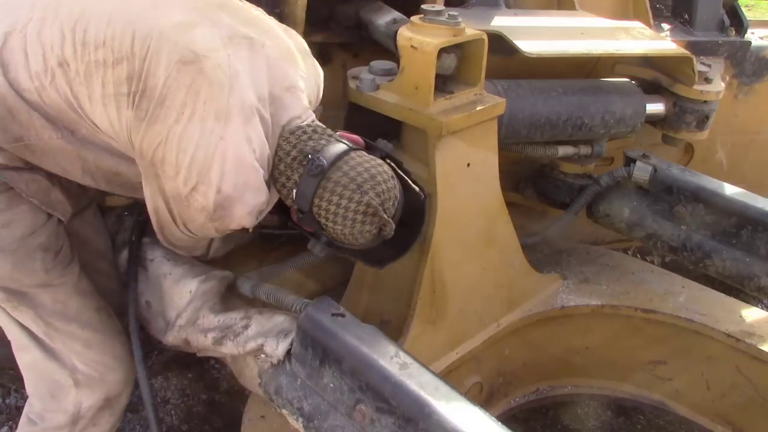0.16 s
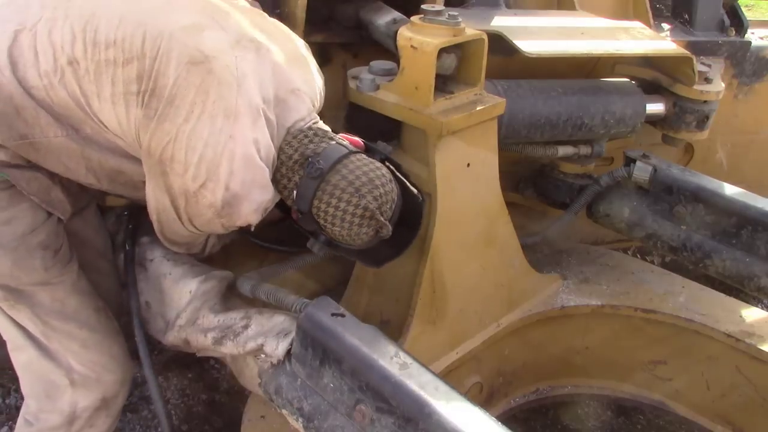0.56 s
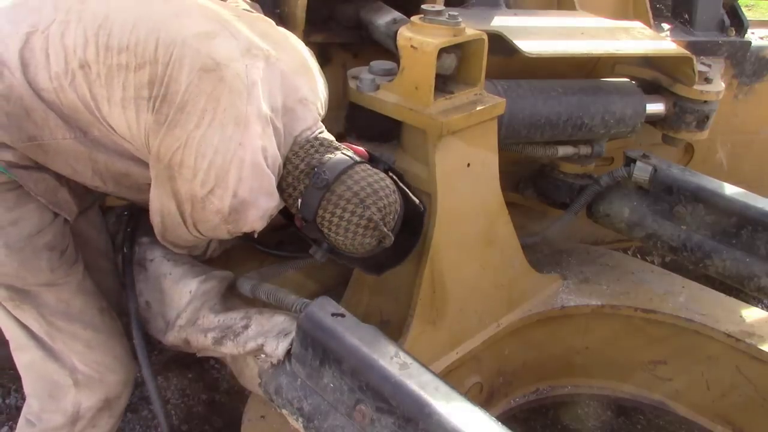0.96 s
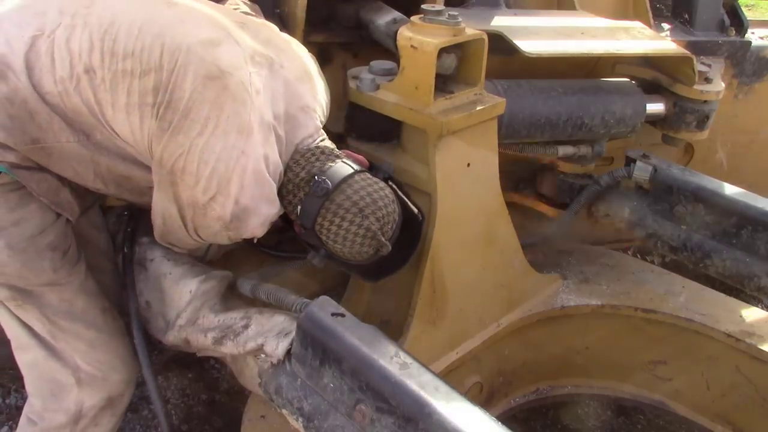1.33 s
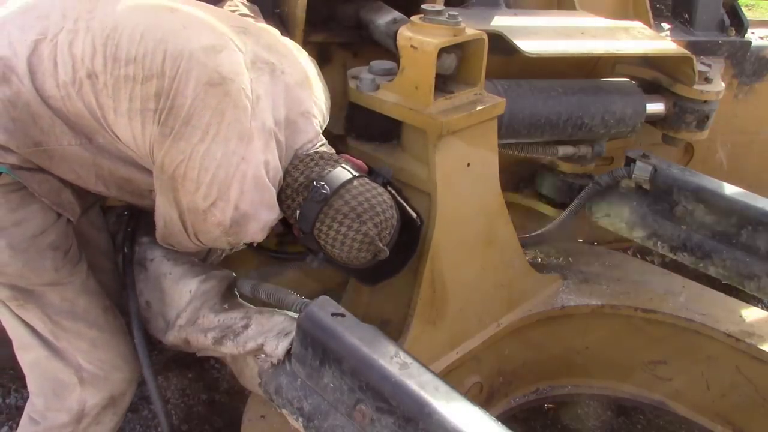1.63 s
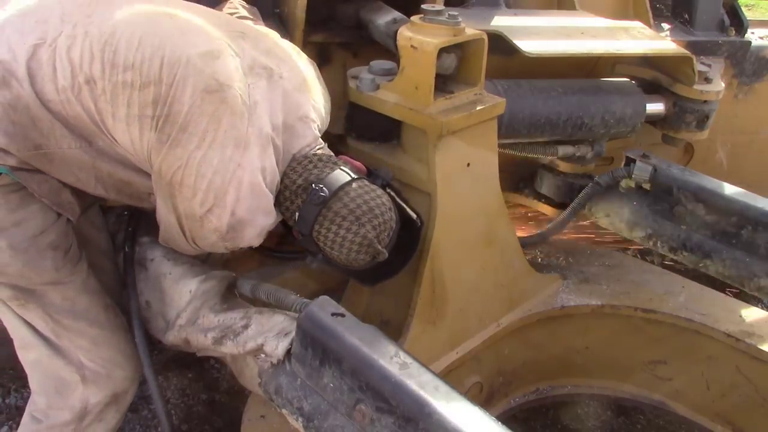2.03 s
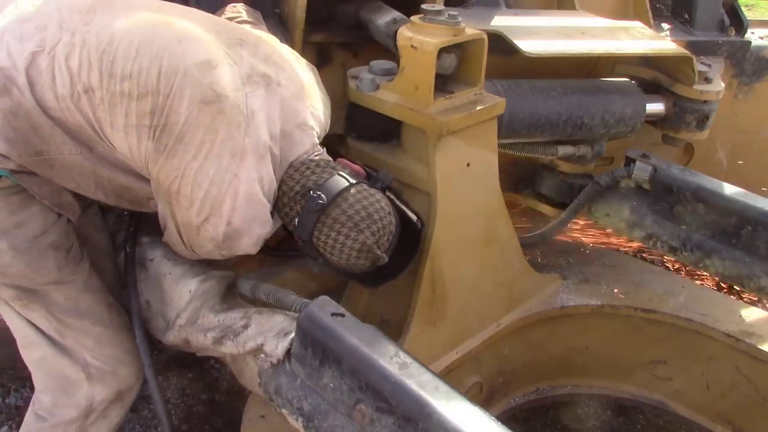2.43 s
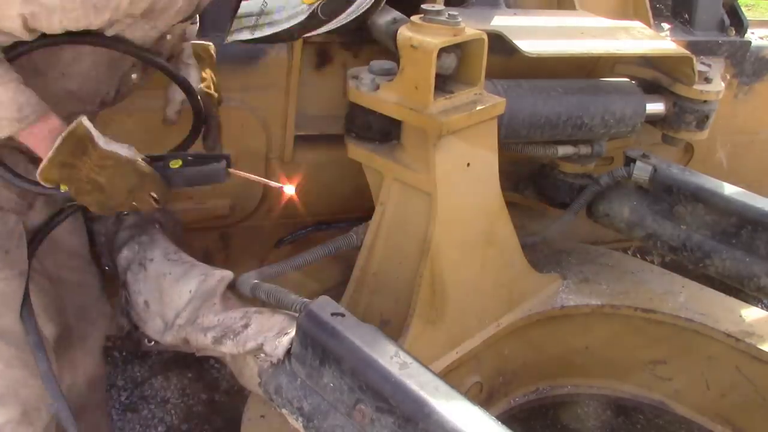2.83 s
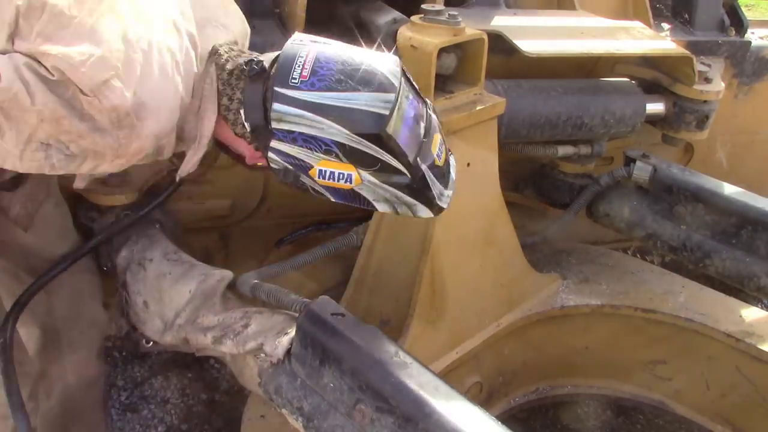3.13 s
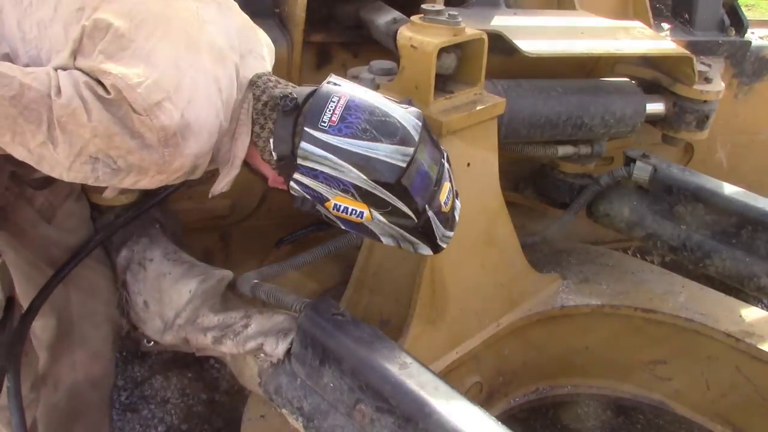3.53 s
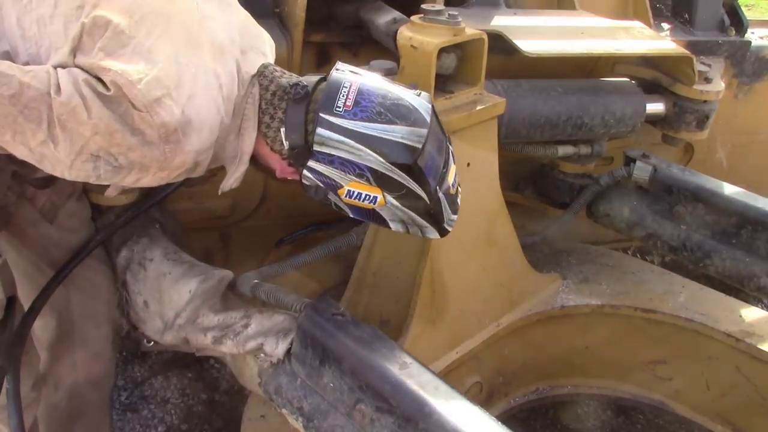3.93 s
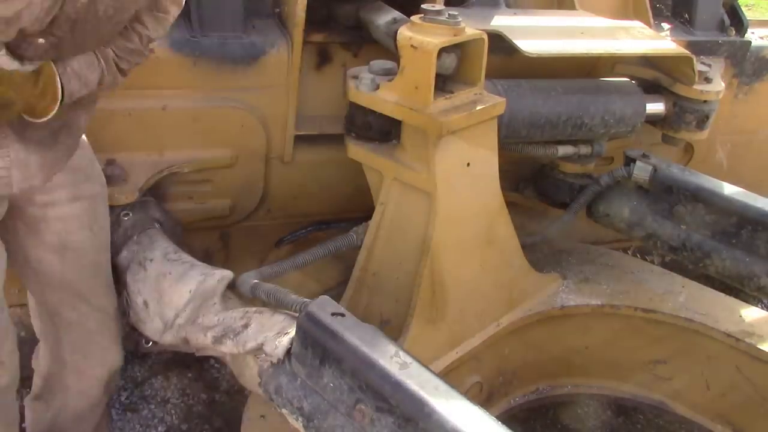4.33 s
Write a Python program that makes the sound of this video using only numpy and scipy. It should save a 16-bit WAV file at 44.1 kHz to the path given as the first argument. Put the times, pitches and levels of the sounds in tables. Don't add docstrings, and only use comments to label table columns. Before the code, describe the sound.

Outdoors, close to an idling engine-driven welder, low wind buffets the microphone. An abrupt cut moves to heavy steel machinery, with the engine farther off and an air jet hissing. The engine revs up, then the arc spits in ragged crackling bursts that ring the metal and drag the engine down. The arc stops, the air shuts off, and a cross-fade brings a close, steady welder and whining compressor, light wind puffs and tiny squeaks.

```python
import sys
import numpy as np
from scipy import signal
from scipy.fft import rfft, irfft, next_fast_len
from scipy.io import wavfile
from scipy.ndimage import uniform_filter1d

SR = 44100
rng = np.random.default_rng(int(sys.argv[2]) if len(sys.argv) > 2 else 0)


def store_wav(level_fs):
    pcm = np.round(np.clip(np.atleast_2d(level_fs), -1, 1) * 32767)
    wavfile.write(sys.argv[1], SR, pcm.T.astype(np.int16))


def level_to_linear(level):
    exponent = np.asarray(level, float) / 20
    return 10 ** exponent


N = 197470
T = np.arange(N) / SR

# pitch_hz, level_db
WIND_COLOUR = [(5, 8.5), (25, 8.5), (60, -1.5), (90, 1), (130, -19), (300, -9), (600, -46)]
# pitch_hz, level_db
BREEZE_COLOUR = [(60, -21), (150, -16), (300, -8), (600, 4), (1000, -1), (1800, -3.5), (3500, -39),
                 (8000, -37)]
# peak_s, level_db
PUFFS = [
    (2.26, -79),
    (2.95, -71),
    (3.41, -67),
    (3.52, -64),
    (3.63, -63),
    (3.8, -57),
    (3.95, -68),
    (4.42, -70),
]
# multiple of firing rate, level_db
IDLE_TONES = [(1, -67), (6, -71), (8, -72), (9, -52), (11, -66), (12, -62), (14, -67), (15, -61), (16, -62),
              (17, -58), (18, -60), (20, -66), (21, -58), (22, -60), (25, -60), (27, -60), (31, -65),
              (32, -60), (36, -63), (38, -61), (39, -64), (40, -63), (44, -65), (46, -67), (60, -65),
              (66, -66), (72, -64), (74, -65), (119, -66), (120, -67)]
# multiple of firing rate, level_db
LOADED_TONES = [(3, -86), (5, -81), (6, -70), (9, -61.5), (15, -67)]
# multiple of firing rate, level_db
RUNNING_TONES = [(3, -74), (5, -82), (6, -63), (7, -67), (8, -72), (9, -52.5), (12, -55), (14, -62),
                 (15, -65), (17, -64), (18, -59), (21, -58), (34, -63), (41, -66), (45, -65), (46, -64),
                 (47, -65), (51, -65), (54, -61), (55, -64), (56, -58), (57, -56), (59, -62), (62, -67),
                 (64, -64), (73, -64), (96, -67), (98, -67), (99, -61)]
# pitch_hz, level_db (per Hz)
WELDER_ROAR = [(88, -41), (150, -26), (354, -23.5), (430, -14), (512, -19), (634, -12.5), (713, -8.5),
               (1090, -9.5), (1820, -2), (2960, -2.5), (3320, -5.5), (5100, 0), (5520, -4.5), (9340, -8.5),
               (15800, -12)]
# pitch_hz, level_db (per Hz)
AIR_COLOUR = [(300, -48), (600, -14.5), (1000, -15.5), (1500, -7.5), (2200, -9.5), (3400, -10), (5000, -1),
              (7000, -7), (8500, -3), (9900, -1.5), (12000, -2), (15800, -11)]
# pitch_hz, width_hz, level_db
HOUSING = [(1090, 155, 6.5), (1557, 530, 6.5), (2270, 140, -4.5), (2716, 870, 6), (5450, 320, -1.5),
           (7350, 1500, 3), (8100, 200, -3), (9100, 810, 3.5), (13830, 530, 6.5), (15670, 440, 13)]
# start_s, length_ms, level_db
SPITS = [(.77, 3.2, -32), (.818, 7.1, -31.5), (.947, 15.5, -37.5), (.967, 6.6, -38), (1.089, 8, -34),
         (1.177, 16.7, -35.5), (1.231, 10, -35), (1.336, 17, -36.5), (1.389, 11.6, -38), (1.409, 9, -36),
         (1.49, 16.4, -36.5), (1.545, 8.6, -34.5), (1.596, 9.3, -33), (1.683, 11.8, -34.5),
         (1.704, 10.7, -36.5), (1.745, 11.3, -34), (1.779, 5.8, -34.5), (1.796, 9.5, -35),
         (1.939, 14.3, -35.5), (1.972, 12.3, -36), (2.072, 7.4, -35.5), (2.109, 8.2, -34.5),
         (2.124, 5.2, -30), (2.136, 13, -37), (2.186, 11.4, -35), (2.225, 10.9, -35), (2.347, 11.5, -37),
         (2.375, 10, -38.5), (2.546, 10.8, -34.5), (2.582, 9.3, -39)]
# start_s, length_ms, level_db
BURNS = [(1.053, 31.5, -37.5), (1.125, 22, -39.5), (1.247, 72, -38.5), (1.522, 11.4, -41.5),
         (1.644, 26, -38), (1.717, 16.3, -42), (1.834, 51.5, -40.5), (1.888, 30.4, -41), (1.954, 20, -40),
         (2.006, 28.7, -38.5), (2.042, 6.7, -34.5), (2.086, 13.3, -39), (2.154, 19.9, -42),
         (2.246, 77, -38.5), (2.386, 41, -40.5), (2.439, 33, -38), (2.49, 42, -41.5), (2.566, 13.8, -39.5)]
# pitch_hz, width_hz, level_db
FRAME = [(1343, 75, -1), (1790, 600, -1.5), (2906, 310, -0.5), (3497, 146, -1), (5190, 790, 4),
         (5766, 390, 2), (6470, 170, 0), (7300, 660, -6.5), (9570, 1050, 2), (10920, 770, -0.5),
         (11520, 430, 0), (12400, 400, -5.5), (13230, 650, -2), (15200, 850, -3)]
# multiple of rotor rate, level_db
ROTOR_TONES = [(2, -78), (3, -69), (4, -59), (5, -59), (6, -60), (7, -57), (8, -63), (9, -62), (11, -51),
               (12, -54), (13, -58), (14, -63), (15, -56), (16, -50.5), (17, -53), (18, -58), (19, -54),
               (20, -61), (21, -60), (23, -61), (24, -60), (28, -59), (31, -62), (32, -60), (33, -60),
               (35, -58), (36, -62), (41, -63), (46, -61), (47, -62)]
# time_s, rate_hz
ROTOR_RATE = [
    (0, 158.5),
    (3.12, 158.6),
    (3.6, 157.96),
    (3.92, 158.28),
    (4.1, 157.85),
    (4.48, 157.95),
]
# pitch_hz, level_db (per Hz)
MACHINES_ROAR = [(88, -67), (150, -46), (254, -29), (405, -26), (622, -16.5), (727, -12.5), (801, -20),
                 (866, -12), (1070, -10), (1360, -11), (1710, -6), (2580, -3), (3460, -6), (4910, -3.5),
                 (15800, -12)]
# start_s, length_ms, slip_rate_hz, high_ring_hz, high_ring_db
SQUEAKS = [
    (4.314, 25, 925, 9420, -38.5),
    (4.371, 13, 854, 11200, -42.5),
    (4.383, 22, 758, 11200, -65),
    (4.422, 47.7, 799, 10570, -43),
]
# pitch_hz, level_db
WIDTH = [(60, -30), (300, -25), (600, -28.5), (1000, -29), (3000, -29), (8000, -27), (10500, -24),
         (12000, -19), (15800, -19)]

CUT_S, FADE_OUT_S, FADE_IN_S = 0.493, (2.703, 2.83), (2.749, 2.955)
IDLE_HZ, RUNNING_HZ = 70.77, 88.95
REV_S, ARC_OFF_S = (0.755, 0.825), 2.6


def curves(table):
    s, *columns = np.transpose(table)
    return [np.interp(T, s, c) for c in columns]


def ramp(start, end):
    return np.clip((T - start) / (end - start), 0, 1)


def unit(x):
    return x / np.sqrt(np.mean(x ** 2))


def smooth(x, seconds):
    keep = np.exp(-1 / (seconds * SR))
    return signal.lfilter([1 - keep], [1, -keep], x)


def shape(x, gain):
    size = next_fast_len(N, True)
    hz = np.arange(size // 2 + 1) * SR / size + 1e-3
    return irfft(rfft(x, size) * gain(hz), size)[:N]


def slope(points):
    hz, db = np.transpose(points)
    return lambda f: level_to_linear(np.interp(np.log(f), np.log(hz), db))


def bump(f, centre, width):
    return 1 / (1 + (2 * (f - centre) / width) ** 2)


def walk(rate):
    hold = int(SR / rate)
    steps = np.repeat(rng.standard_normal(N // hold + 1), hold)
    return unit(uniform_filter1d(uniform_filter1d(steps, hold), hold)[:N])


def hiss(points, flicker_db, rate):
    def colour(f):
        return slope(points)(f) * level_to_linear(sum(db * bump(f, hz, w) for hz, w, db in HOUSING))

    noise = shape(rng.standard_normal(N), colour)
    out, shared = 0, walk(rate)
    for octave in range(8):
        band = shape(noise, lambda f: np.cos(np.pi / 2 * np.clip(np.log2(f / 125) - octave, -1, 1)) ** 2)
        out = out + band * level_to_linear(flicker_db * (0.79 * shared + 0.43 * walk(rate)))
    return unit(out)


def tones(table, hz, wobble_db, live):
    out = np.zeros(N)
    turn = 2 * np.pi * np.cumsum(hz[live]) / SR
    knots = np.arange(0, N / SR + 1, 0.11)
    for k, db in table:
        swell = np.interp(T[live], knots, level_to_linear(db + wobble_db * rng.standard_normal(len(knots))))
        out[live] += np.sqrt(2) * swell * np.sin(k * turn + 2 * np.pi * rng.random())
    return out


def clatter(x, firing_hz, repeat):
    def comb(f):
        echo = np.exp(2j * np.pi * f * 3 / firing_hz)
        return 1 / np.abs(1 - repeat * bump(f, 0, 5000) * echo)

    return unit(shape(x, comb))


def wind():
    gusts = [unit(shape(rng.standard_normal(N) * level_to_linear(1.5 * walk(14)), slope(WIND_COLOUR))) for _ in range(2)]
    first_scene = np.clip((0.458 - T) / 0.0043, 0, 1)
    breeze = unit(shape(rng.standard_normal(N), slope(BREEZE_COLOUR))) * level_to_linear(1.5 * walk(17))
    puffs = sum(level_to_linear(db - 320 * np.abs(T - s)) for s, db in PUFFS)
    breeze = breeze * (level_to_linear(-88) + level_to_linear(-67) * (T < CUT_S) + puffs)
    rattle = level_to_linear(-65) * first_scene * np.sin(2 * np.pi * 300 * T)
    port_level = level_to_linear(np.array([[-57.], [-50.]]))
    return np.array(gusts) * first_scene * port_level + (breeze + rattle) * np.array([[1], [-1]])


def yard_rumble():
    level = level_to_linear(-106 + 8.2 * walk(13))
    return level * unit(shape(rng.standard_normal(N), lambda f: 1 / (1 + (f / 120) ** 4)))


def welder_levels(burning):
    cut = ramp(CUT_S - 0.01, CUT_S + 0.0048)
    rev = ramp(*REV_S)
    fade = ramp(*FADE_OUT_S[::-1])

    def stage(close_db, far_db, speed_db):
        return close_db + cut * (far_db - close_db) + rev * (speed_db - far_db)

    load = smooth(burning, 0.11)
    surge_db = 9 * bump(T, 0.8, 0.034)
    tone = fade * level_to_linear(stage(0.5, -11, -1.5) + 0.53 * surge_db + 2.4 * load)
    roar = fade * level_to_linear(stage(-39, -51, -52) + surge_db + 13.5 * load)
    build_db = -3 * ramp(CUT_S + 0.4, CUT_S + 0.095)
    lifted_db = -6 * ramp(ARC_OFF_S - 0.02, ARC_OFF_S + 0.026)
    valve = 0.29 * fade + 0.69 * ramp(2.7727, 2.767)
    air = valve * cut * level_to_linear(-42 + build_db + lifted_db)
    return tone, roar, air


def welder(strength):
    burning = 1. * (strength > level_to_linear(-46))
    tone, roar, air = welder_levels(burning)
    governor_hz = 1.0 * ramp(ARC_OFF_S + 0.1, ARC_OFF_S - 0.05)
    free_hz = IDLE_HZ + ramp(*REV_S) * (RUNNING_HZ - IDLE_HZ + governor_hz)
    hz = free_hz * (1 - 0.085 * smooth(burning, 0.026))
    up = np.clip((free_hz - 71) / 3, 0, 1)
    hum = (1 - up) * tones(IDLE_TONES[1:], hz, 1.2, T < 0.8) + up * tones(LOADED_TONES, hz, 1.2, T < 2.9)
    panel = level_to_linear(-55) * bump(12 * hz, 1035, 50) ** 0.8
    hum = hum + up * panel * tones([(12, 0)], hz, 1, T < 2.9)
    duck = smooth(burning, 0.008)
    rattle = clatter(hiss(WELDER_ROAR, 0.3, 17), IDLE_HZ, 0.58)
    engine = tone * hum * level_to_linear(2.2 * duck) + roar * rattle
    return engine * level_to_linear(-14 * duck) + air * level_to_linear(-2.9 * duck) * hiss(AIR_COLOUR, 0.45, 25.52)


def current():
    out, bursts = np.zeros(N), list(SPITS)
    for s, ms, db in BURNS:
        parts = max(1, round(ms / 21))
        bursts += [(s + k * ms / parts / 1000, ms / parts, db) for k in range(parts)]
    for s, ms, db in bursts:
        live = slice(int((s - 0.003) * SR), int((s + ms / 1000) * SR))
        age = T[live] - T[live][0]
        growth_db = 1.0 - 3.38 * (1.5 - age / age[-1]) * min(1, 0.0125 / age[-1])
        swell_in = np.clip(age / 0.0045, 0, 1)
        out[live] = np.maximum(out[live], level_to_linear(db + growth_db) * swell_in)
    return uniform_filter1d(out, size=20)


def arc(strength):
    def drop_ring(f):
        rings = bump(f, 1500, 900) + 0.44 * bump(f, 3240, 600)
        rings = rings + 0.59 * bump(f, 5100, 1500) + 0.4 * bump(f, 10500, 4000)
        return level_to_linear(-9.5) * rings / (1 + (1000 / f) ** 6)

    def open_air(f):
        return level_to_linear(-15.5) * bump(f, 8000, 16000) / (1 + (1200 / f) ** 6) + level_to_linear(-33) * (f < 400)

    drive = strength + np.sqrt(smooth(strength ** 2, 0.025)) * level_to_linear(-22)
    drive = drive * level_to_linear(2.3 * walk(350))
    drops = (rng.random(N) < 160 / SR) * rng.standard_normal(N) * 25
    out = shape(drops * strength, drop_ring)
    out = out + shape(rng.standard_normal(N) * drive, open_air)
    for hz, width, db in FRAME:
        spit = rng.standard_normal(N) * level_to_linear(1.3 * walk(90))
        out = out + shape(spit * drive, lambda f: level_to_linear(db) * bump(f, hz, width) / (1 + (900 / f) ** 6))
    rounded = 0.069 * np.tanh(out * level_to_linear(9.0) / 0.09)
    return shape(rounded, lambda f: level_to_linear(-8.5) + (1 - level_to_linear(-7.5)) / (1 + (420 / f) ** 4))


def compressor():
    near, before = ramp(*FADE_IN_S), ramp(*FADE_OUT_S[::-1])
    rotor = near * level_to_linear(0.4) + before * level_to_linear(-11) * ramp(2.15, 2.34)
    roar = near * level_to_linear(-39) + level_to_linear(-47) * ramp(2.45, 2.53) * ramp(2.77, 2.53)
    live = T > 2.1
    welder_hz = RUNNING_HZ * (1 + 0.0006 * walk(5))
    hum = near * level_to_linear(0.1) * tones(RUNNING_TONES, welder_hz, 1.3, live)
    rotor_hz = curves(ROTOR_RATE)[0] * (1 + 0.0004 * walk(12))
    whine = rotor * tones(ROTOR_TONES, rotor_hz, 1.6, live)
    return hum + whine + roar * clatter(hiss(MACHINES_ROAR, 1.0, 9.2), RUNNING_HZ, 0.42)


def squeaks():
    out = np.zeros(N)
    for s, ms, hz, high_hz, high_db in SQUEAKS:
        age = np.clip((T - s) / (ms / 1000), 0, 1)
        live = (age > 0) & (age < 1)
        age = age[live]
        bend = 0.084 * (0.4 - age ** 1.48) if hz < 830 else -0.04 * (1 - age) ** 3
        turn = 2 * np.pi * np.cumsum(hz * (1 + bend)) / SR
        body = np.sin(np.pi * age) ** 0.67
        early = np.sin(np.pi * np.clip(age * max(1, ms / 24), 0, 1))
        for k in range(2, 19):
            low = level_to_linear(-46.5 + 0.2161 * ms) * (bump(k * hz, 2360, 700) + 1.2 * bump(k * hz, 3690, 150))
            high = level_to_linear(high_db) * (bump(k * hz, high_hz, 700) + 0.37 * bump(k * hz, 14200, 1500) + 0.16)
            level = low * body + high * (k > 8) * early
            out[live] += np.sqrt(2) * level * np.sin(k * turn + k * k)
    return out


def scene():
    strength = current()
    mid = yard_rumble() + welder(strength) + arc(strength) + compressor() + squeaks()
    scatter = rng.standard_normal(600) / np.sqrt(600)
    side = shape(signal.fftconvolve(mid, scatter)[:N], slope(WIDTH))
    side = side * level_to_linear(2.8 * (T < 0.49))
    return mid + np.array([side, -side]) + wind()


def roll_off(x):
    return signal.sosfilt(signal.butter(12, 16500, fs=SR, output="sos"), x)


def record(dry):
    top_cut = signal.ellip(10, 0.1, 45, 15640, fs=SR, output="sos")
    mix = signal.sosfiltfilt(top_cut, dry)
    return roll_off(mix)


dry = scene()
out = record(dry)
store_wav(out)
```